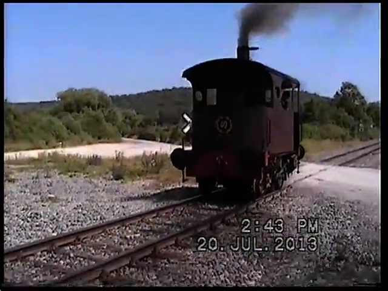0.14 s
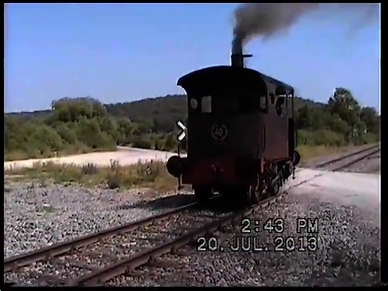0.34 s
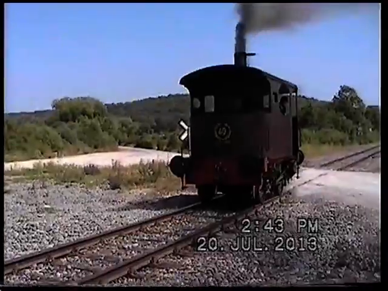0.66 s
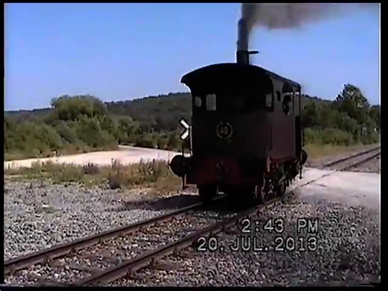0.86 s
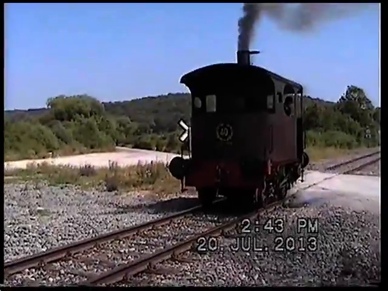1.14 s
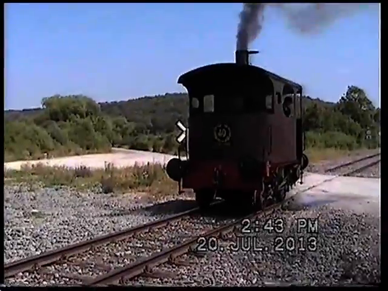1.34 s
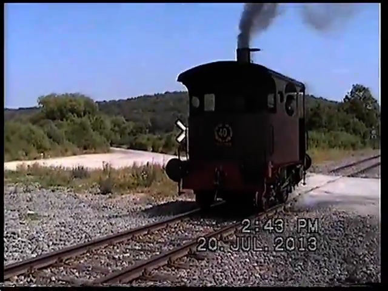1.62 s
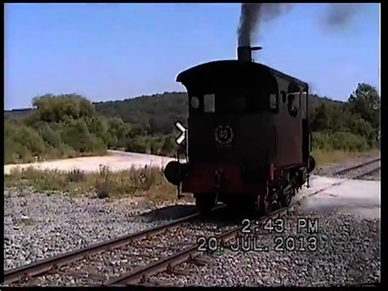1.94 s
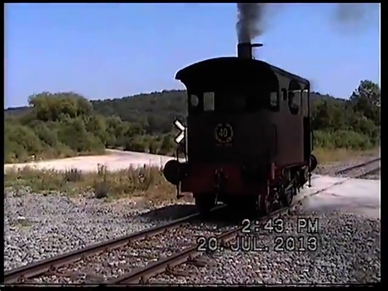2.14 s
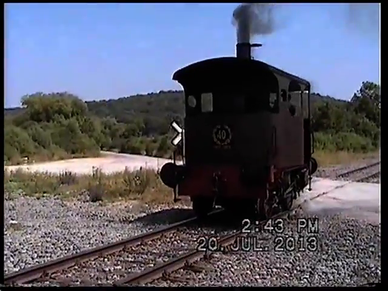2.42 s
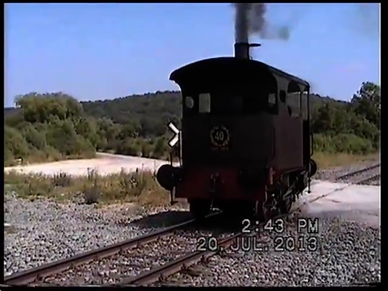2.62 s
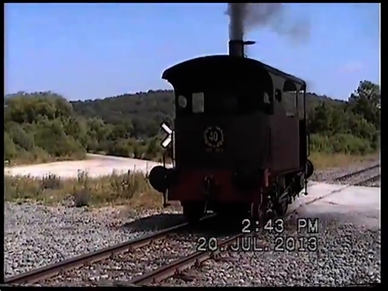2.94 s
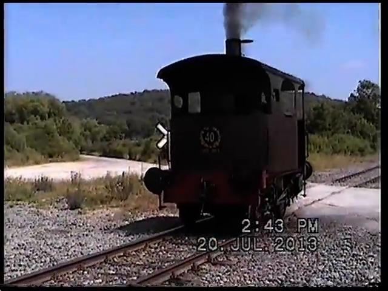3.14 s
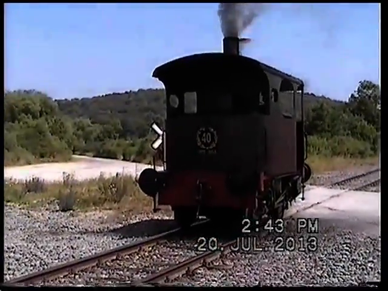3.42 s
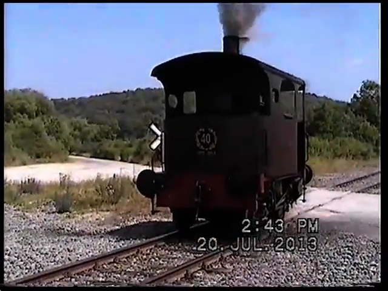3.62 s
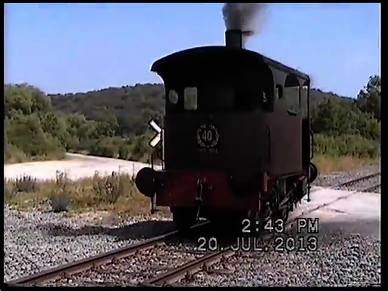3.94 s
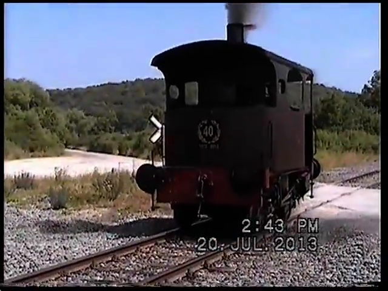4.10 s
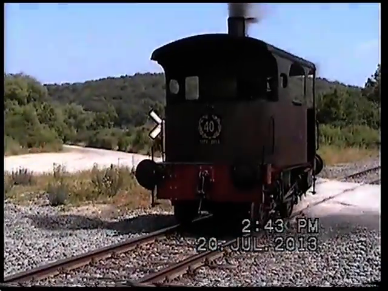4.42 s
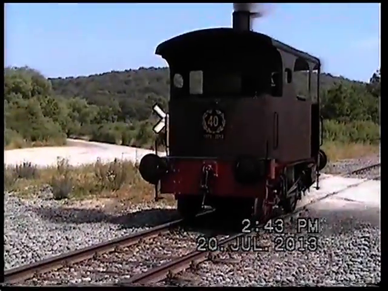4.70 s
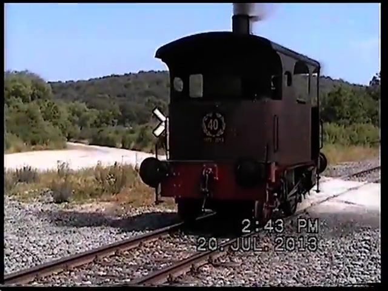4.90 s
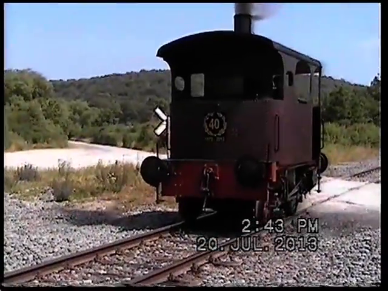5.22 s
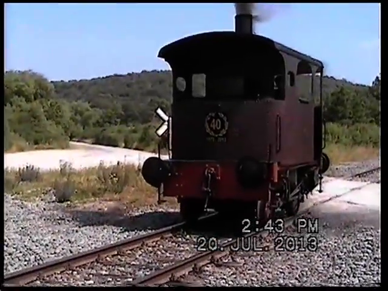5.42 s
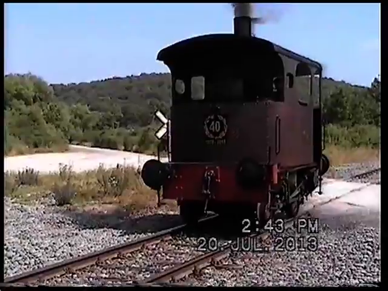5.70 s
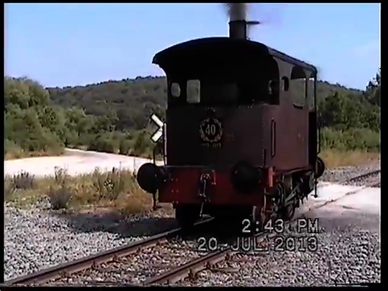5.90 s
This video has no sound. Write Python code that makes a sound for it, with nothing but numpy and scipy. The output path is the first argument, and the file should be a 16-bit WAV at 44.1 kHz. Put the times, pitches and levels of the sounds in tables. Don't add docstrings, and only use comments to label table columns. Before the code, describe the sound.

Steam hisses steadily from a small locomotive with wet spitting and wind thuds, then a loud whistle sputters, blows clear, cuts briefly and restarts.

```python
import sys
import numpy as np
from scipy import signal
from scipy.fft import rfft, irfft, next_fast_len
from scipy.io import wavfile
from scipy.ndimage import uniform_filter1d, map_coordinates

SR = 44100
rng = np.random.default_rng(int(sys.argv[2]) if len(sys.argv) > 2 else 0)


def store_wav(level_fs):
    pcm = np.round(np.clip(np.atleast_2d(level_fs), -1, 1) * 32767)
    wavfile.write(sys.argv[1], SR, pcm.T.astype(np.int16))


def rack_gain(trim_db):
    fader = np.asarray(trim_db, float)
    return 10 ** (fader / 20)


N = 267246

# start_s, flow_db, facing_microphone_db
LEAK_FLOW = [(0, -26.5, 2.5), (.3, -27, 4), (.58, -27, -1), (.8, -27.5, 2), (.92, -28.5, -3),
             (1.1, -27.5, 3), (1.5, -29, -1), (1.62, -31, 1.5), (1.85, -30.5, 0), (2.14, -33, -2.5),
             (2.42, -30.5, 1), (2.6, -28, -1), (2.83, -33, -2), (3.05, -32.5, 0.5), (3.2, -31.5, 5),
             (3.36, -30, -3.5), (3.42, -28, -2)]
# level_db at mean flow, growth_db per dB of flow, drift_db per s,
# own_swell_db, beaming_db per dB of facing
LEAK_LAYERS = [
    (-41.5, .4, -1.3, .5, .2),
    (-30.5, 1, 0, 0.43, 0),
    (-38, 0.28, -1, .6, 0.58),
    (-46.5, 0.07, -1, 1, 1.1),
]
# frequency_hz, density_db per Hz
LEAK_BODY = [(180, -42), (300, -37), (585, -19), (988, -13), (1260, -12), (1650, 0.5), (2040, -6),
             (2230, -0.5), (2690, -11), (2980, -5), (3560, 1.5), (3890, -7), (4300, -20), (5590, -57.5),
             (9460, -120)]
LEAK_CORE = [(2290, -42), (3900, -14.5), (4240, -3.5), (4640, -3), (5260, 0.5), (6450, -4), (6870, -10),
             (7100, -50.5), (9230, -41), (15600, -120)]
LEAK_EDGE = [(4060, -15.5), (6900, -8), (7020, 2.5), (7980, 3), (9130, -1.5), (9800, -5), (12700, -26),
             (21600, -120)]
LEAK_FIZZ = [(5650, -35), (9600, -8.5), (9960, -8), (12600, -16.5), (13400, -26), (15000, -31),
             (15600, -44)]
# start_s, pitch_hz, level_db
NOZZLE_RING = [(0.0, 6280, -40), (0.9, 6280, -30), (1.28, 5840, -35.5), (3.42, 6090, -35)]
# pitch_hz, width_hz, level_db at mean flow
GAP_RESONANCES = [(5180, 220, -37.5), (9280, 240, -46), (7970, 300, -52.5)]

# start_s, level_db
WIND_LEVEL = [(0, -55.5), (.8, -60), (1.35, -61), (1.75, -60.5), (2.0, -63), (2.5, -59), (3.3, -58),
              (3.65, -61.5), (3.9, -57.5), (4.4, -59), (5.2, -59.5), (5.62, -55), (5.85, -66), (6.06, -64)]
# frequency_hz, density_db per Hz
WIND_RUMBLE = [(11, -36), (18, -4), (96, 0), (140, -1.5), (315, -6.5), (503, -13), (600, -17), (780, -25),
               (1320, -120)]
# start_s, peak_db, pitch_hz
WIND_THUDS = [(0.112, -48, 86.1), (0.549, -47, 80), (1.548, -39, 196.5), (1.57, -39, 107),
              (1.583, -43, 155), (1.602, -42, 129), (1.616, -45, 102), (1.644, -60, 121),
              (2.206, -34.5, 110.2), (2.234, -61, 80.7), (2.289, -46, 91), (2.359, -41, 99.6),
              (2.399, -36, 106), (2.424, -55, 116.5), (2.518, -40, 125.6), (2.56, -37, 98.6),
              (2.601, -50, 88.8), (2.714, -37.5, 186), (2.768, -40, 150.5), (2.858, -37, 219),
              (2.889, -48, 94.2), (3.029, -47, 106.3), (3.4, -42, 253)]
# frequency_hz, density_db per Hz
THUD_PUFF = [(40, -35), (80, 1), (200, -2), (330, -9.5), (500, -28)]

# frequency_hz, density_db per Hz
OPEN_INPUT_HISS = [(20, -3), (100, 26), (500, 18), (1200, -26), (3000, -42), (8000, -43), (11000, -49),
                   (15800, -35)]

# start_s, peak_db, pitch_hz
LARGE_SPITS = [(0.104, -37, 807), (0.187, -31, 780), (0.252, -34, 355), (0.352, -40, 767),
               (0.464, -32, 770), (0.479, -37, 678), (0.55, -31.5, 546), (0.585, -35, 307),
               (0.69, -39, 826), (0.835, -37, 328), (0.873, -35.5, 514), (0.974, -39, 708),
               (1.095, -38, 635), (1.13, -38, 301), (1.166, -42, 474), (1.208, -38, 476), (1.362, -48, 810),
               (1.673, -43, 600), (1.814, -41.5, 642), (3.018, -43, 768.7), (3.249, -40, 595),
               (3.938, -43, 900), (3.984, -30.5, 899), (4.003, -34, 895), (4.056, -39, 899),
               (4.067, -35.5, 902), (4.079, -29, 896), (4.178, -46, 875), (4.236, -41, 882),
               (5.97, -38, 860)]
# start_s, level_db
SMALL_SPITS = [(0, -39), (1.3, -51), (4, -46), (4.5, -46), (6.06, -65)]

# start_s, pitch_hz, blow_db, unsteady_share 0-1, overtones_db
WET_START = [(3.365, 1000, -45, .7, -29.5), (3.387, 1084, -10, 0.5, -18), (3.416, 1120, -11, 0.34, -8),
             (3.426, 1131, -1.5, 0.25, 1), (3.51, 1118, -9, 0.4, -6), (3.56, 1128, -14.5, 0.54, -22),
             (3.66, 1111, -17, 0.4, -23), (3.71, 1081, -13, 0.92, -27), (3.79, 1066, -7.5, 0.7, -8)]
# start_s, pitch_hz, blow_db, unsteady_share 0-1, overtones_db
CLEAR_BLAST = [(3.835, 1062, -7.5, 0.33, -0.5), (3.89, 1061, 2.5, 0.12, 0.5), (4.07, 1081, 2.5, 0.22, 3.5),
               (4.2, 1110, -0.5, 0.26, 0.5), (4.5, 1133, 1, .14, -1), (4.95, 1152, 2, 0.13, 2),
               (5.5, 1164, -0.5, 0.062, 1.5), (5.84, 1168, 2.5, 0.051, 1.5), (5.856, 1176, -2, 0.36, -9)]
# start_s, pitch_hz, blow_db, unsteady_share 0-1, overtones_db
VALVE_REOPENED = [
    (5.966, 1186, -17, 0.62, -18),
    (5.973, 1186, 3, 0.16, -2.5),
    (5.992, 1181, 1.5, .1, 2),
    (6.06, 1170, 0, .05, 2),
]
BELL_PARTIALS = [-23, -36.5, -43.5, -38, -40, -49, -62.5, -69]
# centre_s, width_s, change_db
GROUND_FADES = [
    [(4.27, .07, -2.5), (4.97, .3, -9.5), (5.65, 0.067, -2)],
    [(3.5, .04, -9), (4.42, .25, -1)],
    [(3.92, 0.091, -8), (5.38, .1, -6), (6.0, .05, 5)],
    [(3.49, .04, 5), (3.88, .12, -10), (4.55, 0.17, -7)],
    [(3.97, .15, -7), (5.0, .35, 3), (5.7, 0.16, -3)],
    [(3.9, .15, -8), (4.6, 0.64, 5)],
]

# start_s, level_db
JET_FLOW = [(3.37, -43), (3.46, -42), (3.6, -36), (3.74, -35), (3.88, -35), (3.96, -38.5), (4.5, -40.5),
            (5.25, -39.5), (5.8, -42)]
# level_db at mean flow, growth_db per dB of flow, drift_db per s,
# shutting_db per dB of valve closing
JET_LAYERS = [
    (-48.5, 1.16, -2.5, 2),
    (-52.5, 1.11, -1.7, 1.5),
    (-39.5, 1, -0.5, 0.96),
    (-47, 1.5, -3, .5),
]
# frequency_hz, density_db per Hz
ROAR_COLOUR = [(100, -73), (200, -7.5), (500, -9.5), (900, -1.5), (1200, 5.5), (1500, -31)]
BODY_COLOUR = [(1000, -31), (1300, 0), (2000, -3.5), (2800, -4.5), (3500, 1), (4000, -1.5), (4400, -42)]
CORE_COLOUR = [(3600, -44), (4100, -12), (4700, 1.5), (5300, 0), (5900, 2.5), (6500, -3), (7200, -17),
               (7800, -32)]
FIZZ_COLOUR = [(4240, -30.5), (7200, -5.5), (7480, -10.5), (8340, -16.5), (8510, -15.5), (12200, -27),
               (13800, -32), (14500, -34)]

# start_s, level_db, from_hz, to_hz, length_s
SQUEAKS = [
    (3.412, -19, 4100, 4580, 0.012),
    (4.311, -25, 2130, 1290, 0.002),
]

SHUT_S, OPENED_S = 5.866, 5.96


def unit(x):
    return x / np.sqrt(np.mean(np.abs(x) ** 2) + 1e-20)


def curves(rows):
    s, *cols = np.transpose(rows)
    return [np.interp(np.arange(N) / SR, s, c) for c in cols]


def wobble(rate):
    knots = rng.standard_normal(int(N * rate / SR) + 4)
    return unit(map_coordinates(knots, [np.arange(N) * rate / SR]))


def gate(start, end, edge):
    t = np.arange(N) / SR
    return np.clip((t - start) / edge, 0, 1) * np.clip((end - t) / edge, 0, 1)


def rush(spectrum, patchy_db, bins=6, frames=14):
    z = signal.stft(rng.standard_normal(N + 512), nperseg=512)[2]
    field = uniform_filter1d(rng.standard_normal(z.shape), size=int(bins), axis=0)
    field = uniform_filter1d(field, size=int(frames), axis=1)
    x = signal.istft(z * rack_gain(patchy_db * unit(field)), nperseg=512)[1]
    m = next_fast_len(len(x))
    hz, db = np.transpose(spectrum)
    bin_hz = np.fft.rfftfreq(m, 1 / SR)
    colour = rack_gain(np.interp(np.log(bin_hz + 1), np.log(hz + 1), db, right=-120))
    return unit(irfft(rfft(x, m) * colour, m)[:N])


def blur(width_hz):
    return unit(wobble(width_hz) + 1j * wobble(width_hz))


def layered(flow_db, level_db, grows, drift_db, middle_s):
    drift = drift_db * (np.arange(N) / SR - middle_s)
    return level_db + grows * (flow_db - flow_db.mean()) + drift


def leak():
    t = np.arange(N) / SR
    flutter = 0.16 * wobble(8.66) + 0.4 * wobble(29.99)
    flow_db, facing_db = curves(LEAK_FLOW)
    colours = (LEAK_BODY, LEAK_CORE, LEAK_EDGE, LEAK_FIZZ)
    steam = 0
    for layer, colour, patchy_db in zip(LEAK_LAYERS, colours, (1.2, 1.1, 1.6, 1.5)):
        db, grows, drift, own, beamed = layer
        level_db = layered(flow_db, db, grows, drift, middle_s=1.75)
        level_db = level_db + own * wobble(7.12) + flutter + beamed * facing_db
        steam = steam + rack_gain(level_db) * rush(colour, 1.36 * patchy_db, bins=4, frames=70)
    hz, db = curves(NOZZLE_RING)
    steam = steam + rack_gain(db) * np.real(blur(260) * np.exp(2j * np.pi * np.cumsum(hz) / SR))
    for hz, width, db in GAP_RESONANCES:
        level_db = db + flow_db - flow_db.mean() + 2.3 * wobble(3.32)
        steam = steam + rack_gain(level_db) * np.real(blur(width) * np.exp(2j * np.pi * hz * t))
    return steam * gate(-1, 3.43, edge=0.014)


def wind():
    level_db = curves(WIND_LEVEL)[0] + 0.95 * wobble(7.3) + 2.0 * wobble(25)
    out = rack_gain(level_db) * rush(WIND_RUMBLE, patchy_db=1.0)
    rough = rush(THUD_PUFF, patchy_db=0.5)
    for s, db, hz in WIND_THUDS:
        cycles = np.clip(np.arange(N) / SR - s, 0, None) * hz
        push = np.exp(-1.3 * cycles ** 0.81) * np.sin(2 * np.pi * cycles)
        push = push + 0.44 * np.exp(-.8 * cycles) * rough
        out = out - rack_gain(db + 4.0) * cycles * push
    return out


def frame_buzz():
    frame_hz = 49.998
    ms = ((np.arange(N) / SR * frame_hz - .485) % 1) / frame_hz * 1000
    step = uniform_filter1d((ms < 2.05) * 1., size=9)
    spike = np.exp(-((ms - .4) / 0.46) ** 2)
    recovery = -np.cos(np.pi * np.clip((ms - 2.05) / 7, 0, 1)) * np.exp(-(ms - 2.05) / 9)
    sag = uniform_filter1d(np.where(ms > 2.05, recovery, 0), size=9)
    ripple = np.cos(2 * np.pi * (ms - 9) / 4.2) * (ms > 9) * np.exp(-(ms - 9) / 8)
    wave = rack_gain(-64) * step + rack_gain(-61.5) * spike + rack_gain(-60) * sag + rack_gain(-72) * ripple
    return wave - wave.mean() + rack_gain(-82) * rush(OPEN_INPUT_HISS, patchy_db=-9.0)


def spits():
    out, t = np.zeros(N + SR), np.arange(SR // 50) / SR
    moments = rng.uniform(0, N / SR, size=400)
    small_db = np.interp(moments, *np.transpose(SMALL_SPITS)) + rng.normal(0, 3, size=400)
    small = np.c_[moments, small_db, rng.uniform(350, 1200, size=400)]
    dull = signal.butter(1, [220, 1300], "bandpass", fs=SR)
    for s, db, hz in np.vstack([LARGE_SPITS, small]):
        puff = signal.lfilter(*dull, rng.standard_normal(len(t)))
        pop = rack_gain(-60 * t / 0.0054) * np.sin(2 * np.pi * hz * t)
        pop = pop + 1.36 * rack_gain(-60 * t / 0.016) * puff
        out[round(s * SR):][:len(t)] += rack_gain(db + 5.5) * pop
    return out[:N]


def bell_tone(hz, turn, blow_db, wet, over_db):
    t = np.arange(N) / SR
    tone = 0
    for k, db in enumerate(BELL_PARTIALS, 1):
        lift_db = 7.5 * np.exp(-((k * hz - 5674) / 164) ** 2)
        if k == 1:
            db = db + blow_db + 0.93 * wobble(14)
        else:
            db = db + over_db + lift_db + 1.93 * k / 5 * wobble(22)
        for s, width, depth in (GROUND_FADES[k - 1] if k <= len(GROUND_FADES) else []):
            db = db + depth * np.exp(-((t - s) / width) ** 2)
        share = np.clip(wet + 0.054 * (k - 1), 0, 1)
        unsteady = np.sqrt(1 - share ** 2) + share * blur(100 + 12 * k)
        line = np.real(unsteady * np.exp(1j * k * (turn + 1.51) - 1.45j))
        tone = tone + np.sqrt(2) * rack_gain(db - 1.1 * wet * (k - 1)) * line
        if k == 5:
            tone = tone + rack_gain(-43 + over_db + lift_db) * np.real(blur(260) * np.exp(5.12j * turn))
    return tone


def steam_jet(turn, wet):
    t = np.arange(N) / SR
    dying_db = -10 * (1 - np.exp(-np.clip(t - SHUT_S + 0.0095, 0, None) / 0.055))
    valve_db = np.where(t < OPENED_S + .006, dying_db, 3.5)
    flow_db = curves(JET_FLOW)[0]
    levels = []
    for *layer, shuts in JET_LAYERS:
        valve = np.where(valve_db < 0, shuts, 1) * valve_db
        levels.append(layered(flow_db, *layer, middle_s=4.08) + valve)
    roar_db, body_db, core_db, fizz_db = levels
    puffs = unit(1 + 0.067 * (1 - wet) * np.cos(turn))
    high = rack_gain(core_db + 6.0) * rush(CORE_COLOUR, patchy_db=.9)
    high = high + rack_gain(fizz_db) * rush(FIZZ_COLOUR, patchy_db=1.2)
    low = rack_gain(roar_db + 1.4 * wobble(40)) * rush(ROAR_COLOUR, patchy_db=1.0)
    low = low + rack_gain(body_db + 8.5) * rush(BODY_COLOUR, patchy_db=1.0)
    return puffs * high + low


def whistle():
    echo_hz, echo_db, fall_db, echo_share = 1159, -7.5, 14, .6
    faded_db = echo_db - fall_db
    echo = [(SHUT_S, echo_hz, echo_db, echo_share, echo_db),
            (OPENED_S, echo_hz, faded_db, echo_share, faded_db)]
    hz, blow_db, wet, over_db = curves(WET_START + CLEAR_BLAST + echo + VALVE_REOPENED)
    wet = np.clip(wet, 0, 1)
    droop_hz = 90 * gate(5.842, 5.864, edge=0.012) ** 2
    turn = 2 * np.pi * np.cumsum(hz - droop_hz + 2.47 * wobble(45)) / SR
    blast = bell_tone(hz, turn, blow_db, wet, over_db) + steam_jet(turn, wet)
    return blast * gate(3.37, 9, edge=0.015) * gate(-1, N / SR, edge=0.001)


def squeaks():
    out = np.zeros(N)
    for s, db, from_hz, to_hz, length in SQUEAKS:
        n = int(length * SR)
        turn = 2 * np.pi * np.cumsum(np.linspace(from_hz, to_hz, n)) / SR
        out[round(s * SR):][:n] += rack_gain(db) * np.hanning(n) ** .5 * np.sin(turn)
    return out


def scene():
    left = 2 * (leak() + wind() + spits() + whistle() + squeaks())
    return np.array([left, np.zeros(N)])


def low_pass(x):
    return signal.sosfilt(signal.butter(12, 15740, fs=SR, output="sos"), x)


def record(dry):
    floor, knee = 0.37, 5
    loud = dry[0] / (1 + np.clip(-dry[0] / floor, 0, None) ** knee) ** (1 / knee)
    hz, _, z = signal.stft(loud, SR, nperseg=2048)
    band = np.maximum(1 + (hz - 12800) // 500, 0).astype(int)
    level = np.array([np.abs(z[band == b]).mean(axis=0) for b in range(band.max() + 1)])
    waver = uniform_filter1d(rng.standard_normal(level.shape), size=3, axis=1)
    masker = np.abs(z[(hz > 8000) & (band == 0)]).mean(axis=0) * rack_gain(-24 + 5 * waver)
    kept = (level > np.maximum(masker, rack_gain(-93)))[band] | (band[:, None] == 0)
    left = signal.istft(z * kept, SR, nperseg=2048)[1][:N]
    return low_pass(np.array([left, frame_buzz()]))


dry = scene()
out = record(dry)
store_wav(out)
```